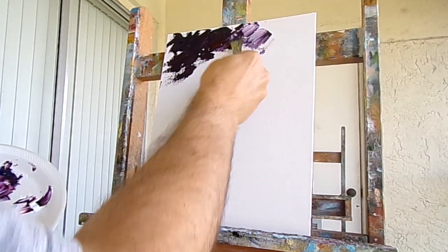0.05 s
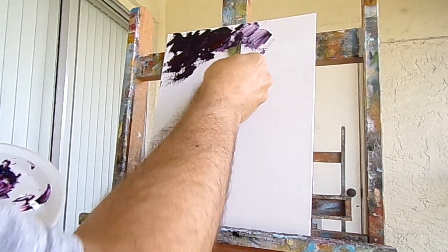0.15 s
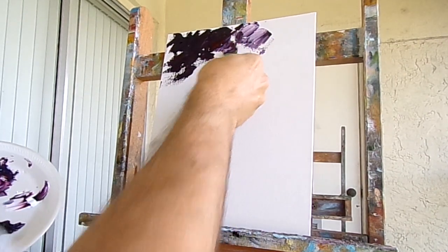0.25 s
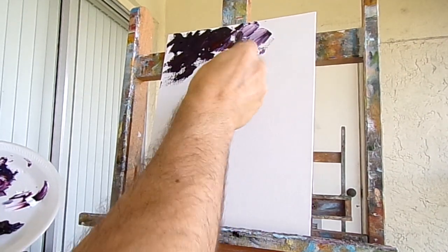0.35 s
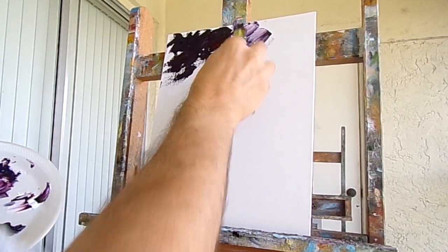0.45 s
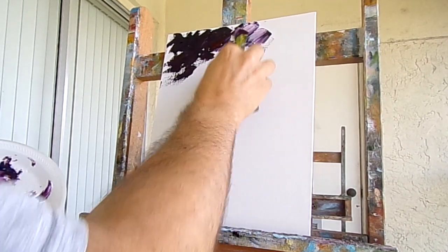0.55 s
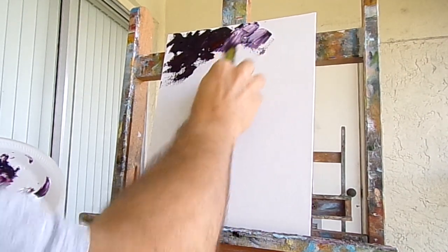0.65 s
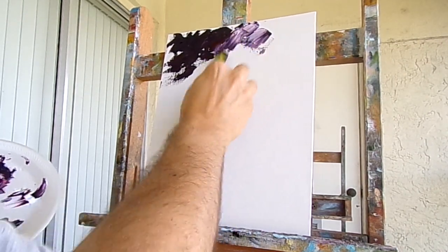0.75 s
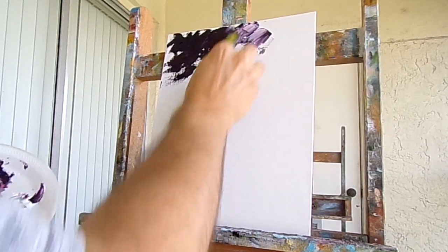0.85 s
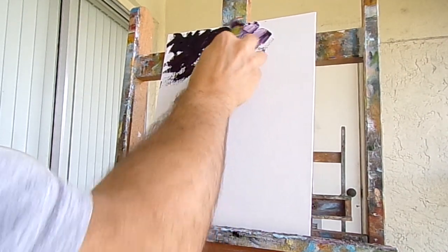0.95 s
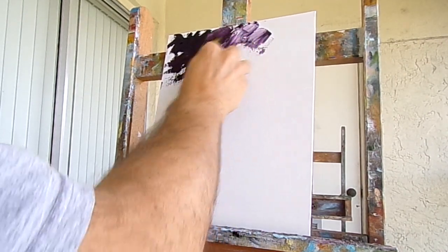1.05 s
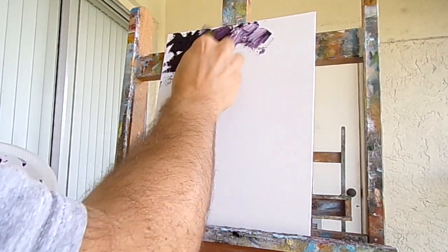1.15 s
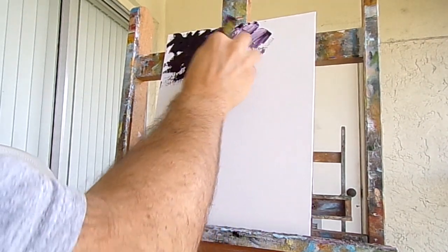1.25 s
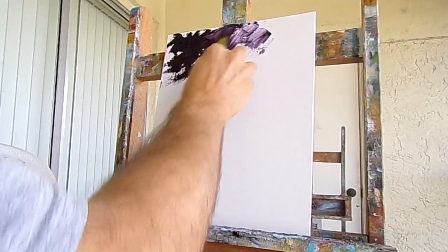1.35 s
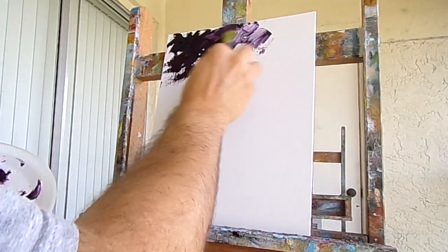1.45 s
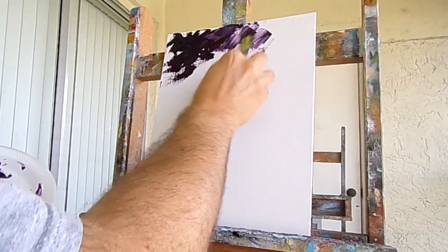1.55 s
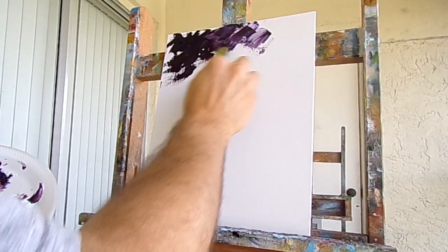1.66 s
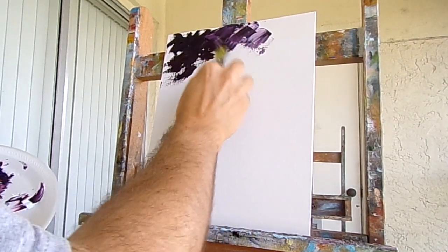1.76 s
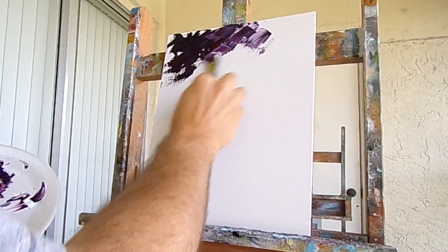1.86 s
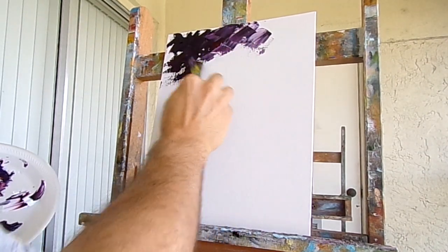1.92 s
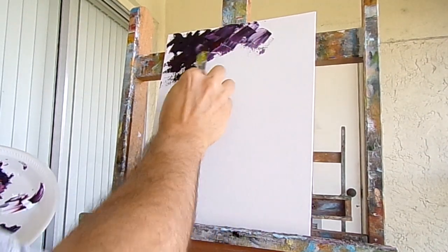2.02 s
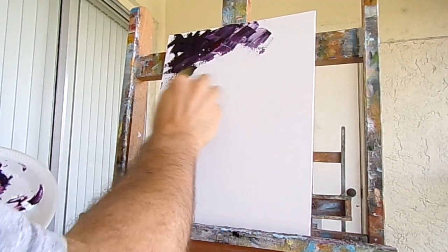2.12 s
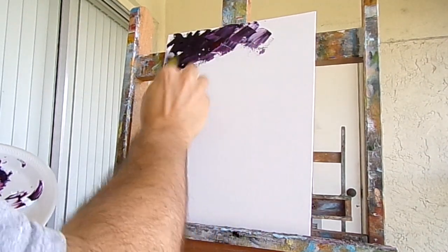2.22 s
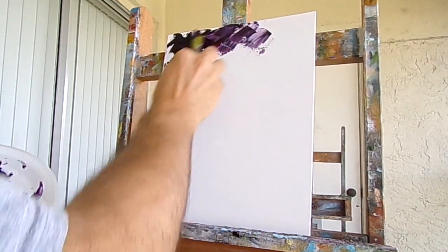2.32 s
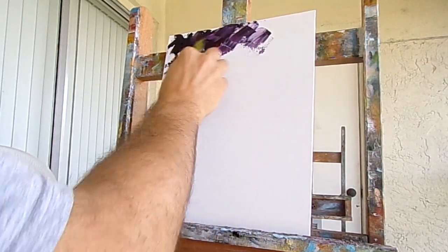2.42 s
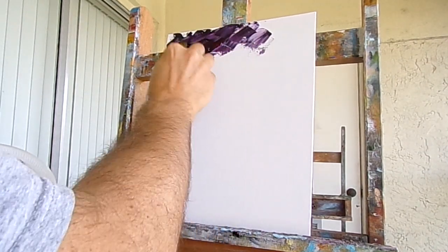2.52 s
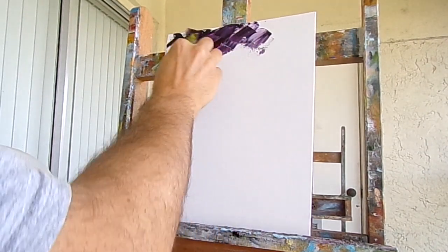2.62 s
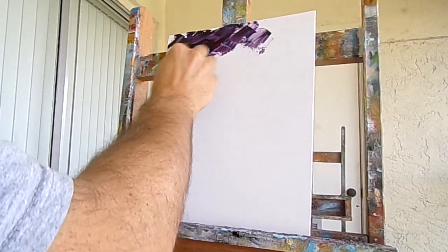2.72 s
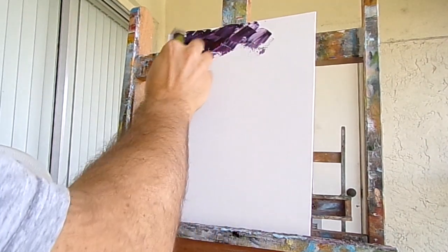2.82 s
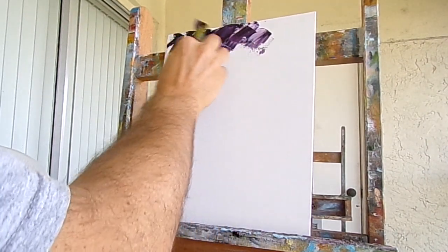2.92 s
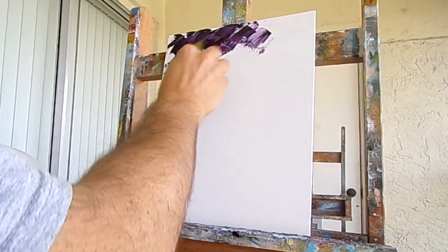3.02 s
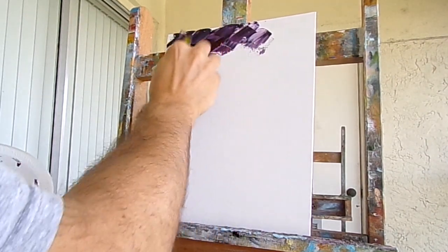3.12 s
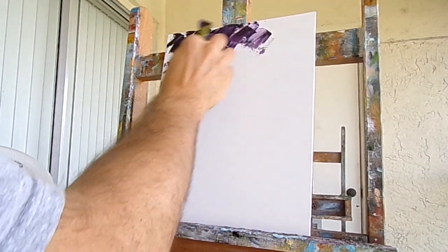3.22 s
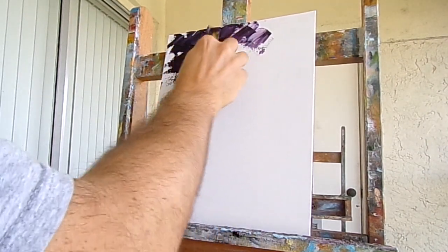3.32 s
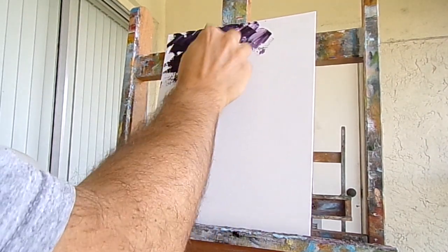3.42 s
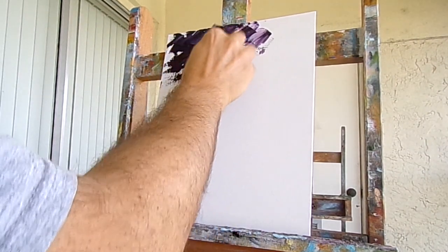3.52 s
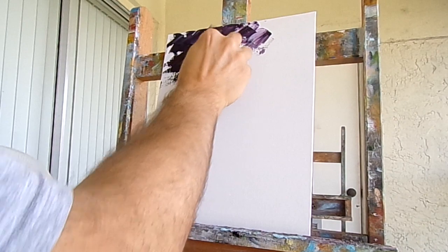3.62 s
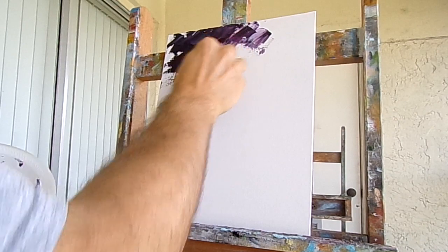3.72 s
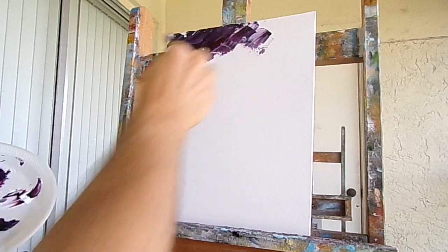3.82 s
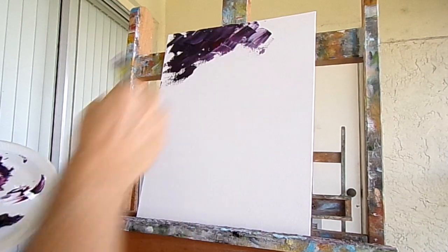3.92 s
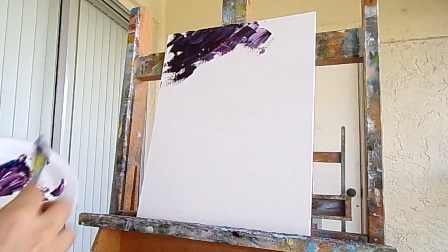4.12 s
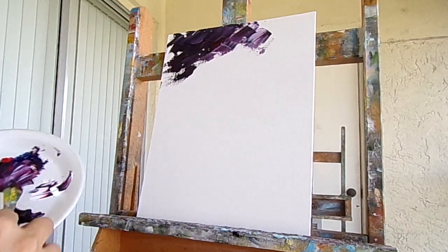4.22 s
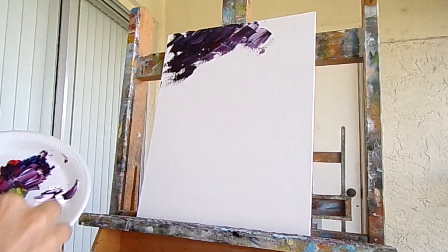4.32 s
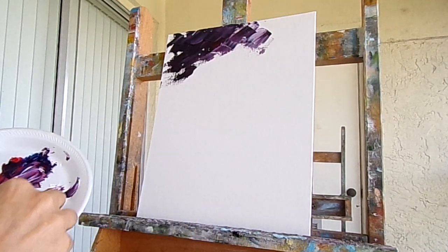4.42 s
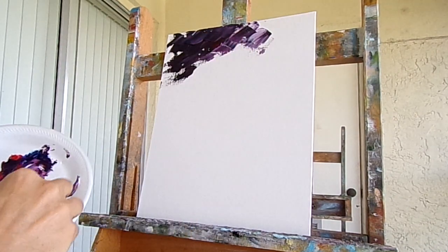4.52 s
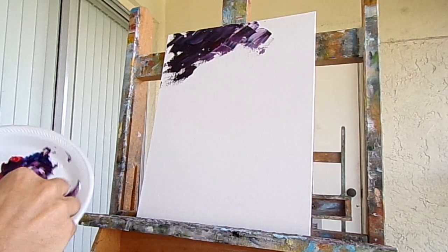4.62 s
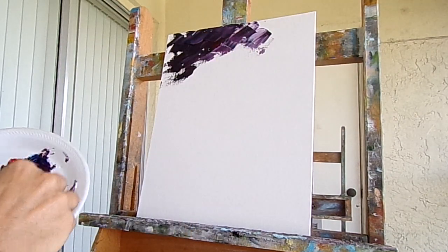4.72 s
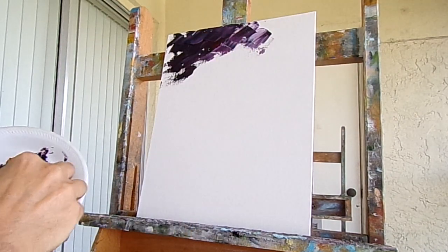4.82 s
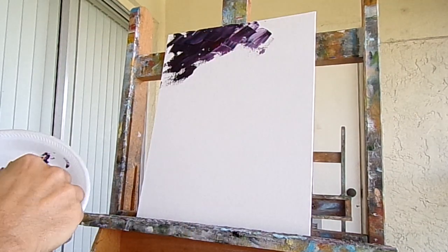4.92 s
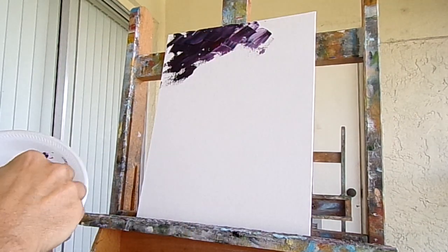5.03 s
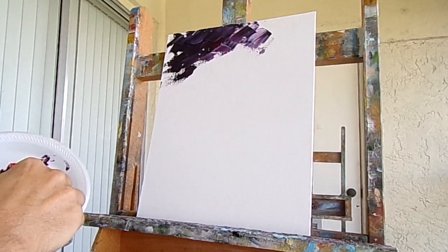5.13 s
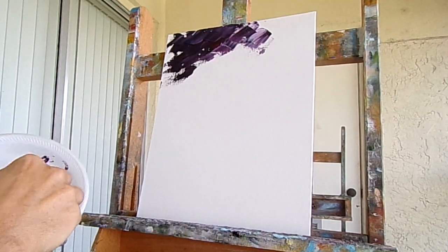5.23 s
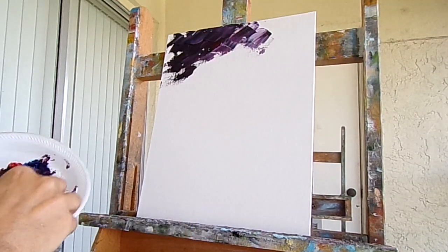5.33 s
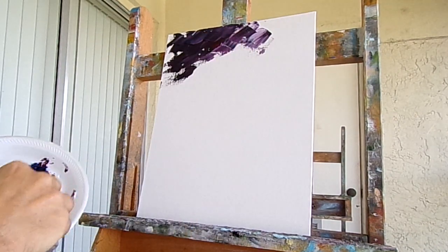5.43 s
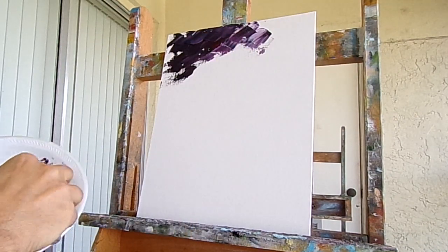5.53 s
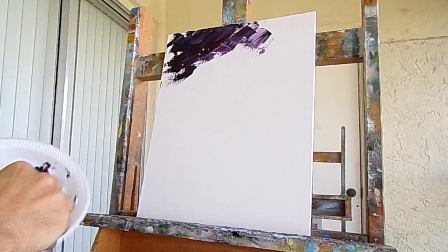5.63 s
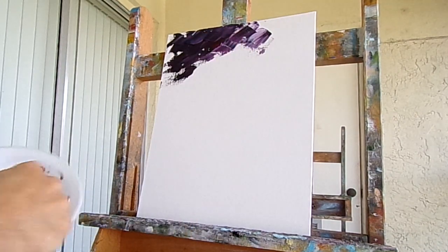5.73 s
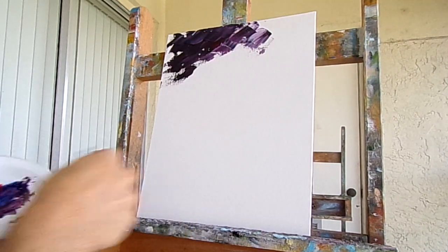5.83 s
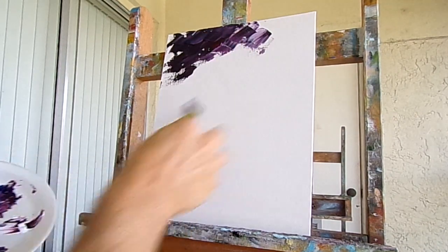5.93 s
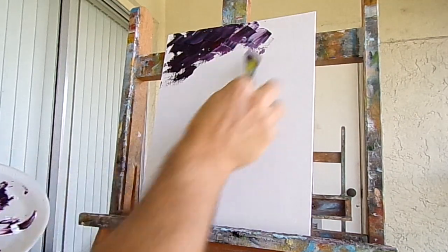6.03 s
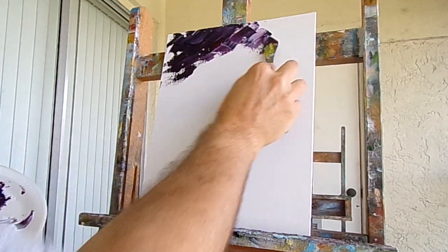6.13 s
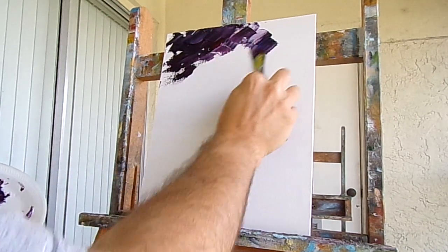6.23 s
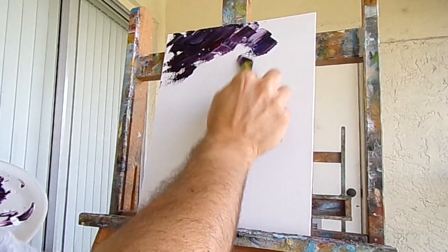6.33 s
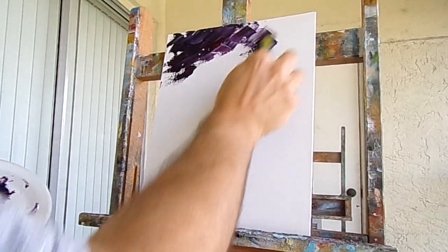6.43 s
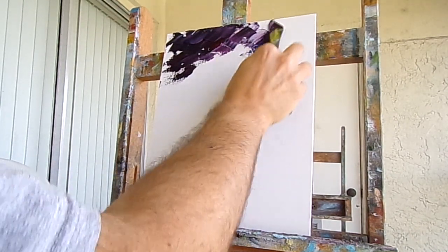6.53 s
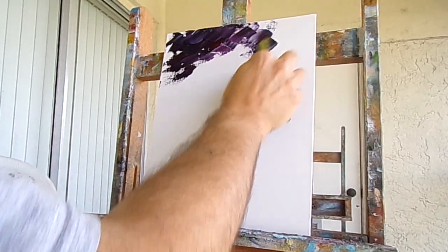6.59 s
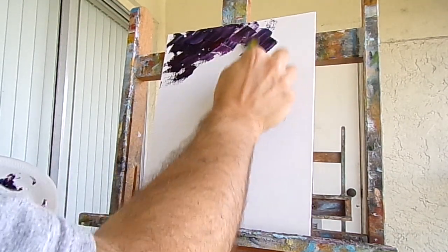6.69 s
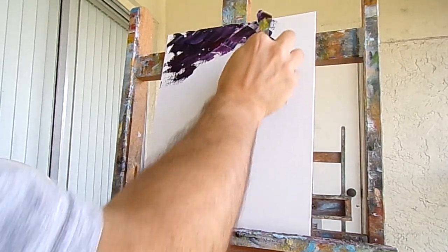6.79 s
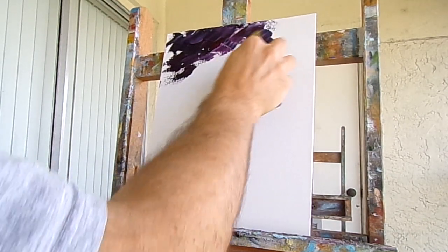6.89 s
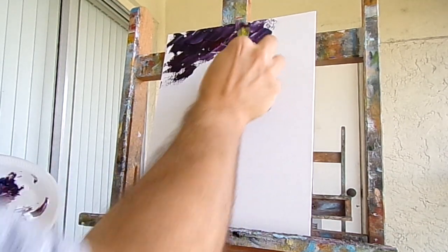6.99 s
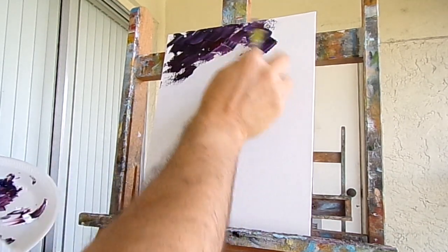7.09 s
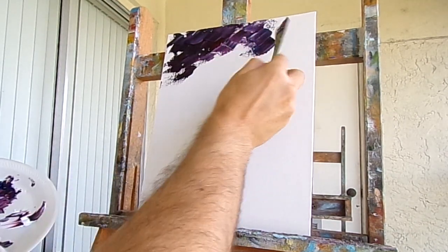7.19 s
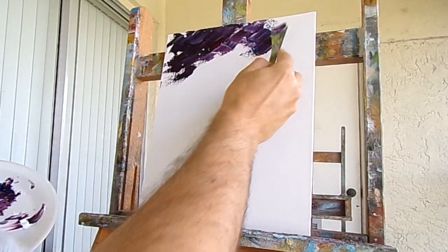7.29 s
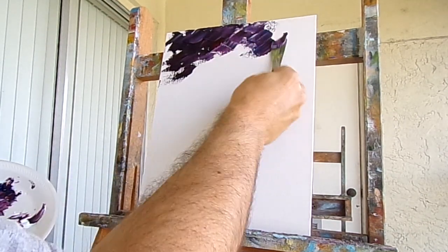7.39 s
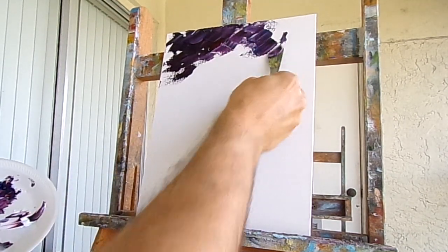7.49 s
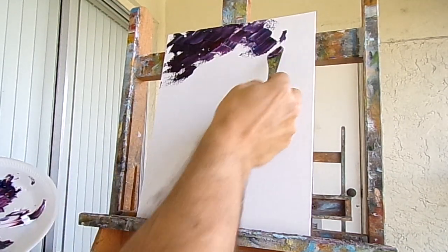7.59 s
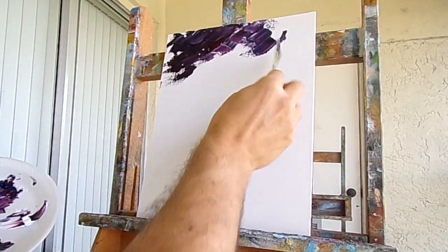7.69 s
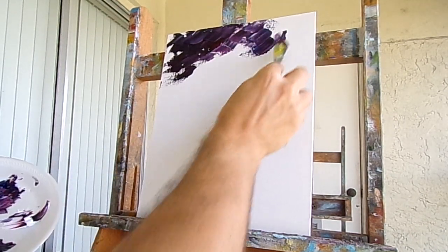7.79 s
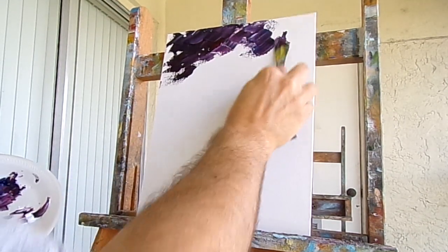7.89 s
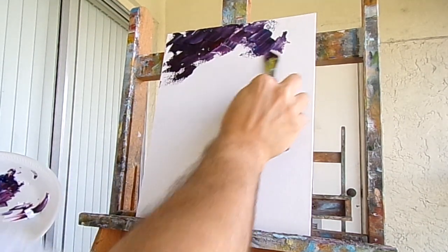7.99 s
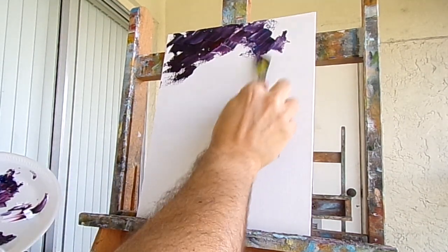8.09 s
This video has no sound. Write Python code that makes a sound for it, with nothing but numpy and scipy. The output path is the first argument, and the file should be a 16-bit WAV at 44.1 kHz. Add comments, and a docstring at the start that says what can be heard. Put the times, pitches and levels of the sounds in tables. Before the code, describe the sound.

Soft, scattered palette-knife dabs and short scrapes on canvas, then clicks and scraping on a plate, one sharp loud snap, and quiet dabs again.

```python
"""In a small, hard-walled studio a palette knife dabs and drags oil paint over a stretched canvas.
Midway it picks up paint from a disposable plate, where a noise swell rises into one sharp snap.
Landings are short falling chirps from struck modes, each with a bright skid and a dull rub.
Strokes are runs of tiny slips with smooth noise, shaped by the blade's modes and a rise and fall.
Faint canvas bumps, dense room reflections and a wash of coloured air noise fill the background."""
import sys
import numpy as np
from scipy import signal
from scipy.fft import rfft, irfft
from scipy.io import wavfile

SR = 44100
rng = np.random.default_rng(int(sys.argv[2]) if len(sys.argv) > 2 else 0)


def output_pcm(signal):
    """Save a mono or channel-first signal as 16-bit PCM at the path in sys.argv[1].

    Samples are clipped to [-1, 1] before scaling.
    """
    pcm = np.clip(np.atleast_2d(signal).T, -1, 1) * 32767
    wavfile.write(sys.argv[1], SR, np.round(pcm).astype(np.int16))


N = 359415
EDGE_HZ = 15900  # upper band limit; also the zero-delay point of the chirps


def amp(db):
    """Decibels to gain."""
    return 10 ** (np.asarray(db) / 20)


def unit(x):
    """Scales to rms 1."""
    return x / np.sqrt(np.mean(x ** 2) + 1e-20)


def read(points, hz):
    """Interpolates (hz, value) points on a log-frequency axis."""
    f, value = np.transpose(points)
    return np.interp(np.log(hz + 1), np.log(f + 1), value)


def add(mix, start_s, sound):
    """Mixes a sound in at start_s, cropped to the mix."""
    at = round(start_s * SR)
    sound = sound[max(-at, 0):]
    part = mix[max(at, 0):][:len(sound)]
    part += sound[:len(part)]


def resonance(hz, centre_hz, width_hz):
    """Response of one damped mode, 1 at its centre."""
    return 1j * hz * width_hz / (centre_hz ** 2 - hz ** 2 + 1j * hz * width_hz)


def body(modes, hz):
    """Direct path plus ringing modes."""
    return 1 + sum(amp(db) * resonance(hz, f, width_hz) for f, width_hz, db in modes)


def chirp(hz, spread):
    """Bending waves carry treble fastest: delay spread / sqrt(Hz) turns a click into a falling chirp."""
    delay_s = spread * np.maximum(1 / np.sqrt(hz + 350) - 1 / np.sqrt(EDGE_HZ), 0)
    return np.exp(-2j * np.pi * np.cumsum(delay_s) * hz[1])


def wander(count, rate_hz):
    """Smooth random signal of rms 1, its rates above rate_hz rolled off."""
    hz = np.fft.rfftfreq(count, 1 / SR)
    slow = rfft(rng.standard_normal(count)) / (1 + (hz / rate_hz) ** 2)
    return unit(irfft(slow, count))


CUSHION_STEEPNESS = 2.8  # power of frequency by which wet paint cuts treble above the corner


def blow(spectrum, modes, corner_hz, thump_db, echoes, spread, size=16384):
    """A cushioned blow and its edge returns ring the surface as a chirp; rms 1 over the first 10 ms."""
    hz = np.fft.rfftfreq(size, 1 / SR)
    returns = sum(strength * np.exp(-2j * np.pi * hz * delay_s) for delay_s, strength in echoes)
    edges = 1 + returns / (1 + (hz / 9000) ** 2)
    cushion = 1 / (1 + (hz / corner_hz) ** CUSHION_STEEPNESS)
    thump = amp(thump_db / (1 + (hz / 700) ** 2))
    struck = amp(read(spectrum, hz)) * cushion * thump
    wave = irfft(struck * edges * body(modes, hz) * chirp(hz, spread))[:size // 2]
    return wave / np.sqrt(np.mean(wave[:SR // 100] ** 2))


# spectrum of a blade blow: hz, relative_db
BLOW_SPECTRUM = [(60, -21.5), (200, -3), (500, -1), (1000, -5.5), (1700, -1.5), (3000, -1), (5000, -5),
                 (9000, -8), (16000, -15)]
# skid of the edge, then dull rub into the paint; levels against the landing
SKID_S, SKID_DB, SKID_TILT_DB_PER_OCT = 0.028, -20, 2
SETTLE_S, SETTLE_DB, SETTLE_TILT_DB_PER_OCT = .07, -14.5, -4
LANDING_RISE = .15  # share of skid and rub length in which pressure builds
FIRM_HZ = 1490  # hardness at which the firm thump applies


def landings(rows, modes, trim_db, firm_thump_db, thump_db_per_oct, scatter=.3, spread=.2, count=7):
    """The blade lands, skids and settles; edge delays differ each time, thump may follow softness."""
    out = np.zeros(N)
    for start_s, level_db, corner_hz in rows:
        echoes = zip(rng.uniform(.0005, .006, count), scatter * rng.choice([-1, 1], count))
        thump_db = firm_thump_db + thump_db_per_oct * np.log2(FIRM_HZ / corner_hz)
        hit = blow(BLOW_SPECTRUM, modes, corner_hz, thump_db, echoes, spread)
        skid = stroke(SKID_S, LANDING_RISE, SKID_TILT_DB_PER_OCT, sizzle_db=0.5, size=2048)
        rub = stroke(SETTLE_S, LANDING_RISE, SETTLE_TILT_DB_PER_OCT, sizzle_db=1.5, size=8192)
        add(out, start_s, amp(level_db) * hit)
        add(out, start_s, amp(level_db + SKID_DB) * skid)
        add(out, start_s, amp(level_db + SETTLE_DB) * rub)
    return amp(trim_db) * out


# blade landings on canvas: start_s, level_before_trim_db, treble_corner_hz (hardness)
CANVAS_LANDINGS = [(0.505, -47, 1000), (1.143, -49, 790), (1.168, -46.5, 396), (1.247, -52, 400),
                   (1.739, -40.5, 1910), (2.039, -41.5, 1710), (2.328, -41, 3370), (3.245, -41.5, 910),
                   (3.479, -47, 600), (3.640, -44.5, 2350), (6.298, -40, 2600), (6.441, -48, 1200),
                   (6.794, -41.5, 2304), (6.968, -45, 960), (7.836, -44.5, 1202), (8.065, -37, 1210)]
# canvas resonances: centre_hz, width_hz, over_direct_db
CANVAS_RESONANCES = [(149, 15, 14), (233, 33, 7.5), (336, 35, 7.5), (577, 20, 12), (1020, 230, 5)]


def canvas_taps():
    """Landings on the cloth; a softer one pushes the surface more."""
    return landings(CANVAS_LANDINGS, CANVAS_RESONANCES, trim_db=-2.0,
                    firm_thump_db=-8.5, thump_db_per_oct=7.5)


# blade landings on the plate: start_s, level_before_trim_db, treble_corner_hz (hardness)
PLATE_LANDINGS = [(3.9125, -35, 5570), (4.0545, -46, 5470), (4.1175, -36.5, 7100), (4.1385, -37.5, 3850),
                  (4.555, -44.5, 900), (5.022, -35.5, 1309), (5.225, -40.5, 900), (5.2335, -50, 7500),
                  (5.511, -41, 1400)]
# plate resonances: centre_hz, width_hz, over_direct_db
PLATE_RESONANCES = [(300, 90, 0), (800, 200, 1), (1550, 240, -8), (2500, 90, -2.5), (3110, 130, -6),
                    (4100, 70, 5), (4673, 80, -2), (5110, 110, -2.5), (8820, 300, -2)]


def plate_taps():
    """Landings on the plate; the thump setting is the same at any hardness."""
    return landings(PLATE_LANDINGS, PLATE_RESONANCES, trim_db=-1.0,
                    firm_thump_db=1.5, thump_db_per_oct=0)


# spectrum of the blade's slips: hz, relative_db
SLIP_SPECTRUM = [(80, -20.5), (300, -5.5), (1000, 2), (2400, 0.5), (3400, 0), (5000, -9), (7000, -10.5),
                 (9200, -14.5), (10500, -29.5), (16000, -24.5)]
# resonances of the sliding blade: centre_hz, width_hz, over_direct_db
BLADE_RESONANCES = [(1040, 300, -4.5), (2395, 250, -3), (3350, 200, -7.5), (6640, 400, -6.5),
                    (9080, 500, -10.5)]


def stroke(length_s, rise, tilt_db_per_oct, sizzle_db, slips_per_s=1600, grain_db=2.5, smear=1.0,
           judder_db=2.0, judder_hz=110, size=16384):
    """Uneven slips and smooth noise through the blade's modes, under a pressure curve; weighted level 1."""
    t, hz = np.arange(size) / SR, np.fft.rfftfreq(size, 1 / SR)
    octaves = np.log2(np.maximum(hz, 500) / 3000)
    sizzle_band = 1 / (1 + ((hz - 9300) / 1500) ** 4)  # thin edge
    blade = body(BLADE_RESONANCES, hz) * chirp(hz, spread=.15)
    sizes = amp(grain_db * np.minimum(rng.exponential(1, size), 3)) * rng.choice([-1, 1], size)
    slips = unit(sizes * (rng.random(size) < slips_per_s / SR))
    friction = slips + smear * rng.standard_normal(size)
    friction = friction * amp(judder_db * np.clip(wander(size, judder_hz), -2, 2))
    colour_db = read(SLIP_SPECTRUM, hz) + tilt_db_per_oct * octaves + sizzle_db * sizzle_band
    rasp = irfft(rfft(friction) * blade * amp(colour_db))
    pressure = np.interp(t / length_s, [0, np.clip(rise, 0, 1), 1], [0, 1, 0]) ** 0.99
    return pressure * rasp / np.sqrt(np.average(rasp ** 2, weights=pressure ** 2 + 1e-12))


# drags over canvas: peak_s, length_s, level_db, tilt_db_per_oct
CANVAS_DRAGS = [(0.000, 0.11, -48, 0), (0.223, 0.12, -47, 0), (0.672, 0.048, -47.5, 0.7),
                (0.95, 0.1, -67, 7), (1.823, 0.043, -42.5, 0.5), (1.861, 0.031, -39, -2.1),
                (2.093, 0.068, -46.5, -2.5), (3.328, 0.077, -69, 11), (3.656, 0.033, -52, -1),
                (3.694, 0.023, -51, -4.5), (6.090, 0.054, -51.5, -4), (6.249, 0.06, -50.5, 0),
                (6.296, 0.02, -47.5, -3), (6.449, 0.023, -48.5, -2), (6.513, .06, -60.5, 8),
                (7.442, 0.25, -63.5, 1.5), (7.487, .024, -43.5, -1.7), (7.518, .07, -52.5, -0.5),
                (7.561, 0.0071, -69, 6), (8.073, .025, -41, 0.5), (8.140, 0.09, -57, 1)]
CANVAS_RISE = .55  # share of length in which pressure builds
FLICK_S, SIZZLE_DB, SIZZLE_DB_PER_DOUBLING = 0.036, 3, 3  # sizzle at flick length, loss per doubling


def spreading():
    """Strokes over the canvas; the edge sizzles on the weave, most in quick flicks."""
    out = np.zeros(N)
    for peak_s, length_s, level_db, tilt_db_per_oct in CANVAS_DRAGS:
        sizzle_db = SIZZLE_DB - SIZZLE_DB_PER_DOUBLING * np.log2(length_s / FLICK_S)
        drag = stroke(length_s, CANVAS_RISE, tilt_db_per_oct, sizzle_db)
        add(out, peak_s - CANVAS_RISE * length_s, amp(level_db) * drag)
    return out


# scrapes on the plate; the last row is a noise swell that rises into the snap:
# peak_s, length_s, level_db, tilt_db_per_oct
PLATE_NOISES = [(3.912, .045, -50.5, 5), (4.026, .04, -50.5, 4.5), (4.146, .09, -46, 4.5),
                (4.246, .025, -54.5, 4), (4.612, .15, -52.5, 0.8), (4.833, .014, -56, 6.5),
                (4.882, .12, -50, -1.65), (5.098, .11, -50.5, 1), (5.280, .015, -51, 5),
                (5.356, .062, -45, 2), (5.647, .2, -42.5, 1)]
PLATE_RISE = 0.52  # share of length in which the level builds


def plate_scrapes_and_swell():
    """Scrapes on the plate, and one noise swell into the snap, made by the same slips and noise."""
    out = np.zeros(N)
    for peak_s, length_s, level_db, tilt_db_per_oct in PLATE_NOISES:
        noise = stroke(length_s, PLATE_RISE, tilt_db_per_oct, sizzle_db=-1)
        add(out, peak_s - PLATE_RISE * length_s, amp(level_db) * noise)
    return out


# spectrum of the plate's snap: hz, relative_db
SNAP_SPECTRUM = [(60, -31.5), (300, -23), (850, -13.5), (1180, -14.5), (1500, -3.5), (2600, -0.5),
                 (4100, 1.5), (5500, -3.5), (7000, 0), (10000, -10), (12300, -15.5), (14000, -6.5),
                 (16000, -19.5)]
# bending waves returning from the plate's rim: delay_s, strength (signed gain)
RIM_RETURNS = [(.0017, .5), (.0029, -.3), (.0043, .35), (.0075, .2)]


def snap(start_s=5.6405, direct_db=-12, radiated_db=-13.0):
    """The bent plate springs free with a hard crack: (straight ahead, sent into the room)."""
    direct, radiated = np.zeros(N), np.zeros(N)
    ahead = blow(SNAP_SPECTRUM, PLATE_RESONANCES, corner_hz=30000, thump_db=-0.5,
                 echoes=RIM_RETURNS, spread=0.39)
    # summed over all directions, the plate's peaks and dips even out
    around = blow(SNAP_SPECTRUM, [], corner_hz=30000, thump_db=0.5, echoes=[], spread=.22)
    add(direct, start_s, amp(direct_db) * ahead)
    add(radiated, start_s, amp(radiated_db) * around)
    return direct, radiated


# hand works on the canvas: start_s, end_s
CANVAS_WORK = [(0, 3.8), (6.2, 11)]


def flex(level_db=-67.0, bumps_per_s=45, size_db=2):
    """While the hand works on it, the slack cloth gives faint, dull bumps."""
    t, hz = np.arange(N) / SR, np.fft.rfftfreq(N, 1 / SR)
    working = sum((t > start_s) & (t < end_s) for start_s, end_s in CANVAS_WORK)
    sizes = amp(size_db * np.minimum(rng.exponential(1, N), 3)) * rng.choice([-1, 1], N)
    bumps = working * sizes * (rng.random(N) < bumps_per_s / SR)
    colour = amp(read(BLOW_SPECTRUM, hz)) * body(CANVAS_RESONANCES, hz) / (1 + (hz / 750) ** 2)
    return amp(level_db) * unit(irfft(rfft(bumps) * colour * chirp(hz, spread=0.1954), N))


# spectrum of the air noise: hz, relative_db
AIR_SPECTRUM = [(25, -19), (50, -16.5), (80, -6.5), (150, -3), (230, 1), (400, -5), (750, -7),
                (1400, -11.5), (2600, -13.5), (4500, -24), (7000, -34.5), (10500, -45.5), (13000, -37.5),
                (15500, -35.5)]
# low room resonances in the air noise: centre_hz, width_hz, over_direct_db
ROOM_RESONANCES = [(80, 11, -7), (127, 12.4, -6.5), (224.3, 24, -4), (600, 42, -5), (800, 69, -3)]


def air(level_db=-54.0, swell_db=-0.08, rustle_db=0.7):
    """Air noise coloured by room modes; its low part stirs unevenly, its high part is nearly steady."""
    hz = np.fft.rfftfreq(N, 1 / SR)
    noise = rfft(rng.standard_normal(N))
    spectrum = noise * amp(read(AIR_SPECTRUM, hz)) * body(ROOM_RESONANCES, hz)
    low_share = 1 / (1 + (hz / 900) ** 2)
    low = irfft(spectrum * low_share, N) * amp(rustle_db * wander(N, 11.9))
    high = irfft(spectrum * (1 - low_share), N) * amp(swell_db * wander(N, 1.5))
    return amp(level_db) * unit(low + high)


# reverberation time: hz, t60_s
REVERB_TIME = [(150, 1.1), (700, 0.3), (2500, 0.44), (6000, 0.37), (14000, 0.3)]
# reverberation spectrum before the build-up: hz, against_input_db
REVERB_LEVEL = [(150, -1), (800, -1.5), (2500, -3), (5000, -5.5), (8000, -10), (12000, -14), (16000, -9)]


def room(x, first_s=.004, build_s=.006):
    """Dense reflections from near walls: decaying noise, each band with its own decay time."""
    hz, t, z = signal.stft(rng.standard_normal(SR), SR, nperseg=256)
    t60_s = read(REVERB_TIME, hz)[:, None]
    decay = np.exp(-np.log(1000) * t / t60_s)
    equal_energy = np.sqrt(2 * np.log(1000) / t60_s / SR)  # level independent of decay time
    z = z * amp(read(REVERB_LEVEL, hz)[:, None]) * decay * equal_energy
    tail = signal.istft(z, SR, nperseg=256)[1]
    tail = tail * np.clip((np.arange(len(tail)) / SR - first_s) / build_s, 0, 1)
    return signal.fftconvolve(x, tail)[:N]


def scene():
    """Knife work on canvas and plate, its reverberation, and the air."""
    touches = canvas_taps() + plate_taps() + flex()
    strokes = spreading() + plate_scrapes_and_swell()
    crack, crack_radiated = snap()
    echo = room(amp(-2.0) * touches + amp(1) * strokes + crack_radiated)
    return (touches + strokes + crack + echo + air())[None]


# narrow dips in the microphone's response: centre_hz, width_hz
MICROPHONE_DIPS = [(3680, 170), (4370, 220), (8040, 850), (11730, 1200)]


def record(dry):
    """The microphone's narrow dips, then a linear-phase low-pass at EDGE_HZ."""
    hz = np.fft.rfftfreq(N, 1 / SR)
    colour = np.prod([1 - resonance(hz, f, width_hz) for f, width_hz in MICROPHONE_DIPS], axis=0)
    heard = irfft(rfft(dry) * colour, N)
    low_pass = signal.firwin(511, EDGE_HZ, window=("kaiser", 9), fs=SR)
    return signal.oaconvolve(heard, low_pass[None], "same")


dry = scene()
out = record(dry)
output_pcm(out)
```